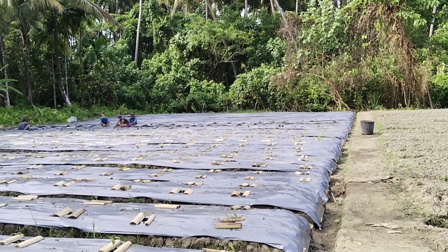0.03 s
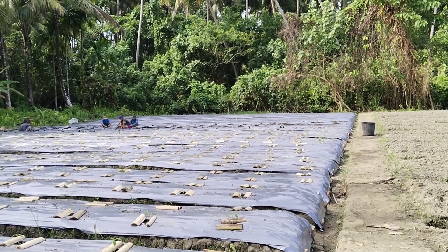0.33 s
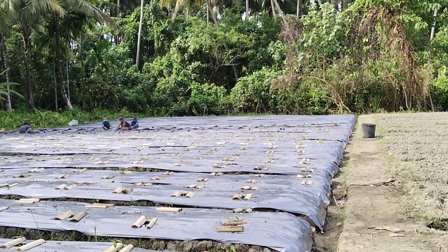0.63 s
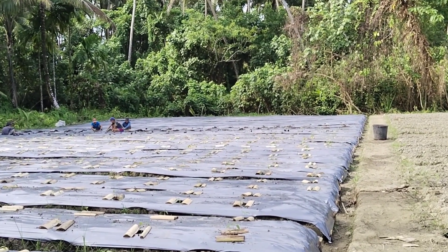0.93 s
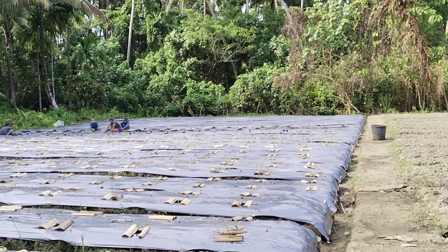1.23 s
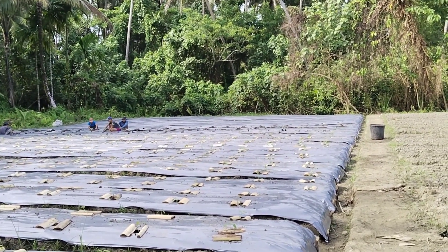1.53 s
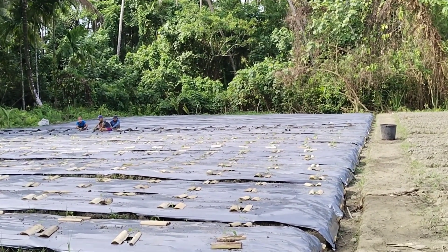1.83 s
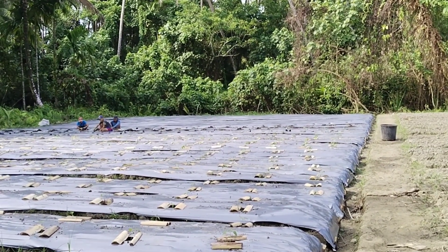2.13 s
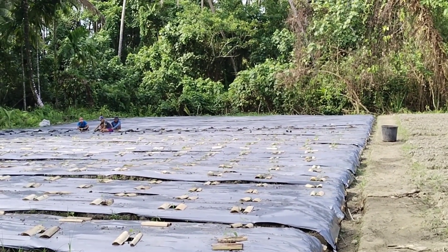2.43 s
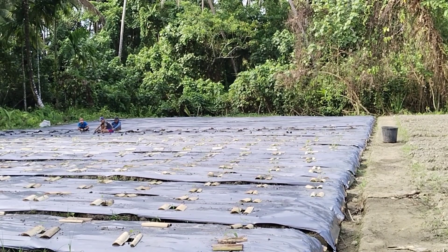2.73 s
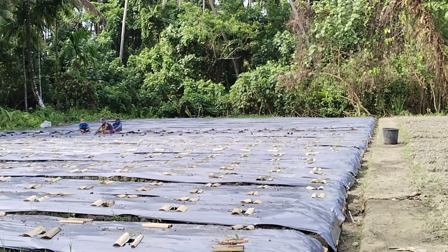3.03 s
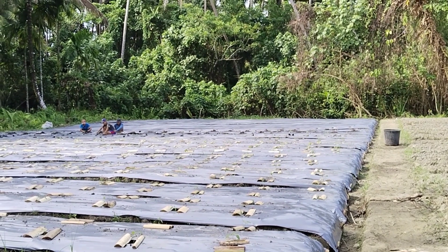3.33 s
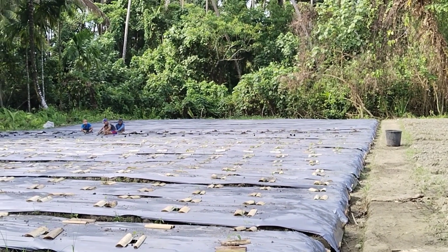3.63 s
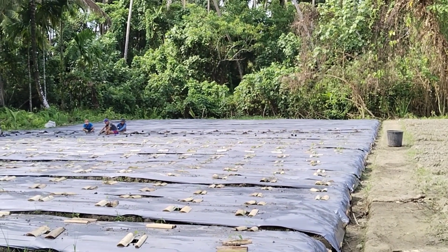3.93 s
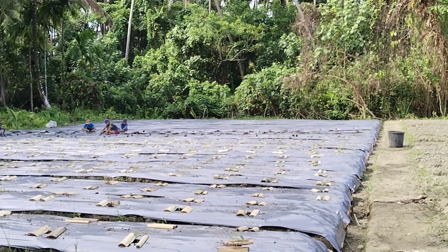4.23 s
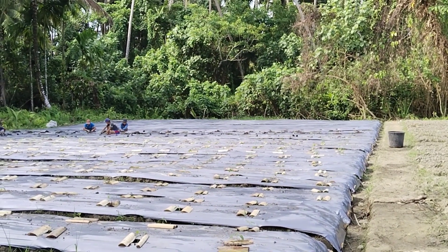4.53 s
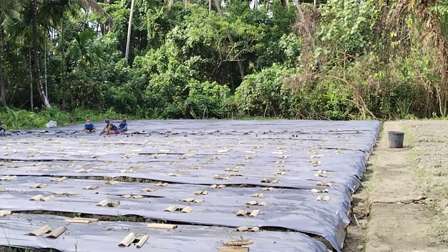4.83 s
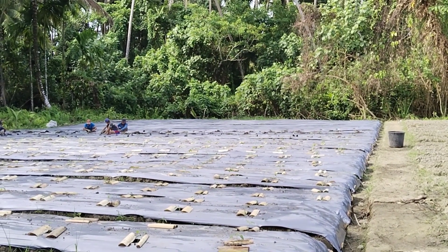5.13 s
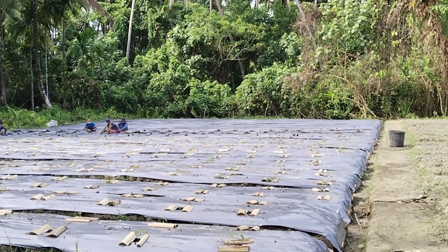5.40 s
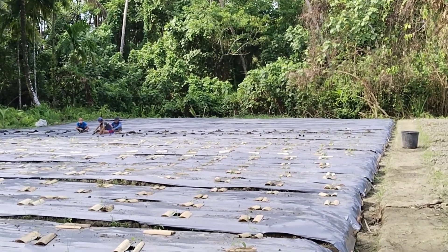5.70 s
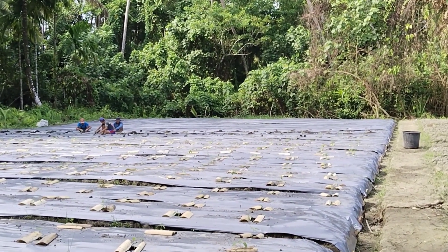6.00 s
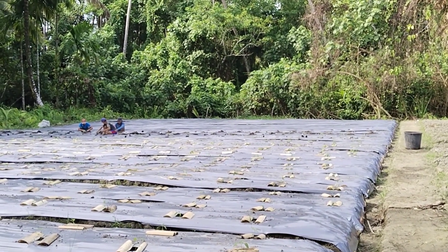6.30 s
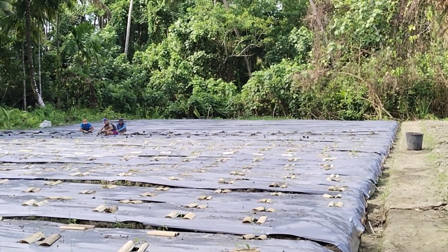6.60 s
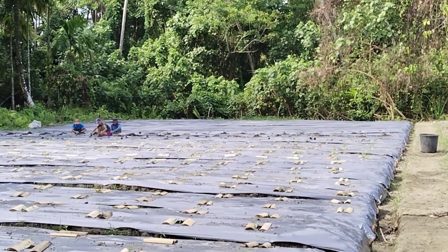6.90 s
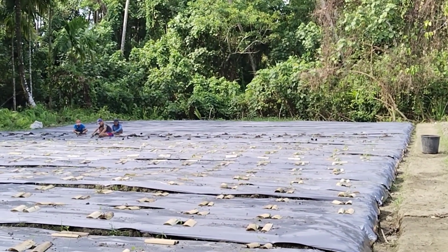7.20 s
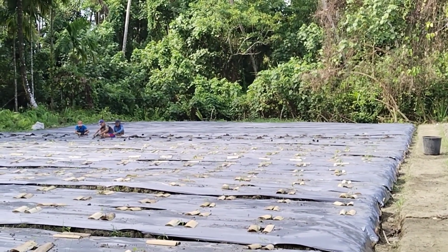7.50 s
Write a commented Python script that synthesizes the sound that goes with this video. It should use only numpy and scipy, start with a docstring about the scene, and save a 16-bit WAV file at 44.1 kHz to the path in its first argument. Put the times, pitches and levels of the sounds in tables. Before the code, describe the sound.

A bird sings loud whistles ending in sharp falling whips over steady crickets, hissing insects and a light breeze.

```python
"""Crickets trill and bush crickets hiss, wing on wing, over a light breeze and a distant rumble
at the edge of a tropical wood. A bird's whip dies away among the trees; dry leaves rustle.
The bird sings four phrases: a pip, a long rising whistle, two loud falling whips.
A thin insect note and far birds come and go. Late on, a small bird adds very high squeaks.
Trunks and leaves scatter every bird note."""
import sys
import numpy as np
from scipy import signal
from scipy.fft import rfft, irfft, next_fast_len
from scipy.io import wavfile
from scipy.ndimage import uniform_filter1d, map_coordinates

SR = 44100
rng = np.random.default_rng(int(sys.argv[2]) if len(sys.argv) > 2 else 0)


def bounce(signal):
    """Save signal as a 16-bit WAV file at the path given by the first command-line argument."""
    frames = np.transpose(np.atleast_2d(signal))
    limited = np.clip(frames, -1, 1)
    pcm = np.round(limited * 32767).astype(np.int16)
    wavfile.write(sys.argv[1], SR, pcm)


N = 341775

# Table levels are relative; the sources add their own gains.
# cricket chorus: (pitch [Hz], scatter [Hz], pulse rate [Hz], level [dB])
CHORUS = [(3981, 9.57, 46, -61), (3996, 15, 17, -63.5), (4053, 8, 19.5, -65.5), (4016, 34, 44, -68.5)]
CHORUS_LEVEL = [(0, -59.5), (1, -59), (2, -58.5), (3, -59.5), (3.7, -60), (4.5, -58.5), (5.6, -57),
                (6.4, -58), (7.2, -58), (7.75, -60)]  # (time [s], level [dB])
# (faded in by [s], pitch [Hz], scatter [Hz], pulse rate [Hz], level [dB])
LONE_CRICKETS = [(4.5, 3198, 22, 34, -76), (0.5, 4780, 50, 26, -82.5), (4.5, 4300, 23, 37, -88),
                 (-2, 5590, 78, 26, -85.5)]
HISS_SPECTRUM = [(3760, -51), (6400, -16.5), (6550, -15), (7190, -2), (7630, 4), (8020, -1.5), (8480, -12),
                 (9100, -8.5), (9670, -11.5), (10500, -24.5), (13600, -59.5), (22000, -120)]  # bush crickets: (frequency [Hz], level [dB])
HISS_LEVEL = [(0.35, -68), (3.14, -68.5), (3.29, -71), (4.49, -66.5), (4.79, -67.5), (6.05, -67)]  # (time [s], level [dB])

BREEZE_SPECTRUM = [(12, -40.5), (20, -15), (30, -5), (44, 2.5), (72, 4.5), (106, 0.5), (135, -7.5),
                   (166, -17), (260, -20.5), (400, -55.5)]  # (frequency [Hz], level [dB])
BREEZE_LEVEL = [(0.05, -61.5), (0.39, -62.5), (0.63, -54.5), (1.18, -58.5), (2.39, -49), (3.01, -56),
                (3.05, -47), (3.35, -56), (4.5, -50.5), (4.72, -55), (4.76, -52), (6.19, -55.5),
                (7.68, -54), (7.7, -60)]  # (time [s], level [dB])
RUMBLE_SPECTRUM = [(82, -39), (140, 0), (156, -5.5), (209, -6), (292, -2), (381, -0.5), (498, -8.5),
                   (751, -2), (840, -2), (1030, -9), (1200, -18), (1600, -15), (1750, -19.5), (2000, -20),
                   (2600, -44), (4400, -120)]  # (frequency [Hz], level [dB])
LEAF_SPECTRUM = [(1000, -18), (1600, -5), (2400, 6.5), (3000, -0.5), (4500, -3), (6500, -10),
                 (10000, -18.5)]  # (frequency [Hz], level [dB])
DISTANT_LEVEL = [(0.05, -60), (0.82, -57.5), (1.18, -59.5), (1.67, -55.5), (3.52, -59), (4.18, -57),
                 (7.49, -58.5), (7.7, -57)]  # rumble and leaf wash: (time [s], level [dB])
RUSTLES = [(0.085, 0.23, -63), (0.205, 0.05, -65), (2.963, 0.011, -62), (4.42, .012, -67)]  # (time [s], length [s], level [dB])
RUSTLE_SPECTRUM = [(1800, -18), (2400, 3), (2900, -12), (3450, 0.5), (3800, -2), (4450, -6), (5000, -7),
                   (5450, -6), (5900, -4), (6500, -5), (7500, -17), (11000, -28)]  # (frequency [Hz], level [dB])
WOOD_DECAY = [(2000, 0.8), (3300, 0.66), (8000, 0.7)]  # (frequency [Hz], T60 [s])

# (pip time [s], pip pitch [Hz], pip level [dB], whistle pitch [Hz], whistle level [dB],
#  first whip time [s], whip level [dB])
PHRASES = [(.5235, 3020, -38.5, 2245, -49.5, .8727, -31.2), (2.0435, 3000, -38.5, 2228, -49, 2.3840, -31.5),
           (2.7895, 2930, -39.8, 2205, -51.5, 3.1717, -32.5),
           (5.6245, 2900, -41, 2190, -54.5, 5.9907, -30.5)]
PIP_PATH = [(0, 0.96, -13), (.003, 0.99, -1.5), (.008, 0.926, -3.5), (.012, .85, -10.5), (.017, .78, -14)]  # (time [s], pitch [ratio], level [dB])
WHISTLE_PITCH = [(0, .87), (.07, .93), (.16, .97), (.37, .985), (.55, .993), (.72, 1), (1, .99)]  # (position [0-1], pitch [ratio])
WHISTLE_LEVEL = [(0, -15), (.15, -9.5), (.37, -1), (.46, -4.5), (.66, .5), (.79, 1), (.83, -12), (.92, -7),
                 (1, -14)]  # two swells, a drop, a soft end: (position [0-1], level [dB])
SHORT_WHIP_PATH = [(0, 3690, -13), (.002, 3440, -5.5), (.008, 3126, -0.5), (0.011, 2850, -5),
                   (0.015, 2580, -10), (.021, 2440, -13)]  # (time [s], pitch [Hz], level [dB])
LONG_WHIP_PATH = [(0, 3650, -13), (.003, 3700, -1), (.012, 3520, -1.5), (.022, 3284, -2.5),
                  (.032, 3014, -3.5), (.042, 2650, -11), (.052, 2333, -22), (.062, 1990, -30)]  # (time [s], pitch [Hz], level [dB])

INSECT_NOTES = [(.85, -65), (2.22, -64), (3.56, -66.5), (4.85, -67), (5.2, -70), (6.2, -68.5), (6.65, -69),
                (7.55, -70.5)]  # (time [s], level [dB])
INSECT_PATH = [(0, 5800, -4), (.09, 5920, 1), (.2, 5986, -7.5), (.45, 6070, -8), (.9, 6120, -15)]  # (time [s], pitch [Hz], level [dB])
FAR_SLIDES = [(1.109, 0.066, 6600, 7400, -68), (1.28, 0.051, 4300, 4550, -74),
              (1.48, 0.042, 5400, 5100, -69), (1.98, 0.044, 5600, 5130, -72),
              (3.794, 0.029, 1750, 2220, -64), (3.916, 0.019, 1857, 2060, -66),
              (7.041, .17, 2108, 2166, -66.5)]  # (time [s], length [s], start [Hz], end [Hz], level [dB])
FAR_CHIPS = [(3.83, 5900, -64), (4.924, 5750, -58.5), (6.113, 6000, -55), (6.86, 5640, -58)]  # (time [s], top [Hz], level [dB])
SLURS = [(6.127, 0.022, 8200, 7720, -52), (6.143, 0.044, 7010, 6420, -47),
         (6.225, 0.047, 8850, 8700, -51.5), (6.412, 0.094, 9050, 8650, -54), (6.85, 0.028, 7400, 6430, -50),
         (7.07, .055, 7460, 6050, -54), (7.295, 0.03, 6940, 6700, -47), (7.335, 0.037, 6900, 6100, -56)]  # small bird: (time [s], length [s], start [Hz], end [Hz], level [dB])
SQUEAKS = [(6.389, 0.08, 8670, 7080, -45.5), (6.597, 0.098, 9000, 7900, -43.5),
           (6.825, 0.085, 8830, 7950, -44.5), (7.066, .109, 8820, 8060, -44),
           (7.324, .112, 8900, 8520, -45)]  # small bird: (time [s], length [s], top [Hz], shelf [Hz], level [dB])


def amp(db):
    """Decibels to gain."""
    return 10 ** (np.asarray(db) / 20)


def unit_rms(x):
    """Scale to rms 1."""
    return x / np.sqrt(np.mean(x ** 2) + 1e-20)


def log_interp(points, hz):
    """Interpolate (frequency [Hz], value) points on a log axis."""
    knots_hz, values = np.transpose(points)
    return np.interp(np.log(hz + 1), np.log(knots_hz + 1), values)


def curve(points):
    """Interpolate (time [s], value) points at every sample."""
    return np.interp(np.arange(N) / SR, *np.transpose(points))


def wobble(rate_hz):
    """Smooth random curve with knots at rate_hz."""
    knots = rng.standard_normal(int(N * rate_hz / SR) + 4)
    return map_coordinates(knots, [np.arange(N) * rate_hz / SR])


def sine(hz):
    """Oscillator following a per-sample frequency."""
    return np.sin(2 * np.pi * np.cumsum(hz) / SR)


def filtered(x, response):
    """Apply the gain response(hz)."""
    size = next_fast_len(N + 8192)
    return irfft(rfft(x, size) * response(np.fft.rfftfreq(size, 1 / SR)), size)[:N]


def noise(spectrum):
    """Coloured noise, rms 1."""
    return unit_rms(filtered(rng.standard_normal(N), lambda hz: amp(log_interp(spectrum, hz))))


def add(out, start_s, x):
    """Mix x into out."""
    i = max(round(start_s * SR), 0)
    out[i:i + len(x)] += x[:len(out[i:])]


def note(path, rasp=0):
    """Tone along (time [s], pitch [Hz], level [dB]) points; rasp is fractional pitch jitter."""
    s, hz, db = np.transpose(path)
    t = np.arange(s[0], max(s[-1], s[0] + .004), 1 / SR)
    jitter = np.interp(t, np.linspace(t[0], t[0] + 1, 600), rng.standard_normal(600))
    pitch_hz = uniform_filter1d(np.interp(t, s, hz), size=130) * (1 + rasp * jitter)
    ramp = np.clip(np.minimum(t - t[0], t[-1] - t) / .002, 0, 1)
    envelope = amp(np.interp(t, s, db)) * np.sin(ramp * np.pi / 2) ** 2
    return np.sqrt(2) * envelope * sine(pitch_hz)


def among_trees(x, wet_db, build_s):
    """Direct sound plus scatter from trunks and leaves that builds up and dies away."""
    hz, t, bins = signal.stft(rng.standard_normal(int(SR * .8)), SR, nperseg=256)
    decay = amp(-60 * t / log_interp(WOOD_DECAY, hz)[:, None])
    onset = 1 - np.exp(-(t / build_s) ** 2)
    tail = signal.istft(bins * decay * onset, SR, nperseg=256)[1]
    impulse = amp(wet_db) * tail / np.linalg.norm(tail)
    impulse[0] += 1
    return signal.fftconvolve(x, impulse)


def near_leaves(x, wet_db, delay_s, decay_s):
    """Direct sound plus early echoes from foliage round the perch."""
    t = np.arange(SR // 8) / SR
    impulse = rng.standard_normal(len(t)) * np.exp(-t / decay_s) * (t > delay_s)
    impulse *= amp(wet_db) / np.linalg.norm(impulse)
    impulse[0] = 1
    return signal.fftconvolve(x, impulse)


def cricket(hz, scatter_hz, pulse_hz):
    """Wings ring at one wavering pitch, pulsing with the strokes; rms 1."""
    pitch_hz = hz + scatter_hz * (wobble(70) + .4 * wobble(3))
    strokes = 1 + .18 * sine(pulse_hz * (1 + .01 * wobble(3.12)))
    return unit_rms(strokes * sine(pitch_hz))


def crickets():
    """Close pitches beat into one trill; lone crickets deep in the trees blur behind it."""
    chorus = sum(amp(db + 1.3 * wobble(6.1)) * cricket(*voice) for *voice, db in CHORUS)
    out = amp(curve(CHORUS_LEVEL) + 1.5) * unit_rms(chorus)
    for full_s, *voice, db in LONE_CRICKETS:
        fade_in = np.clip((np.arange(N) / SR - full_s) * 2 + 1, 0, 1)
        blurred = unit_rms(among_trees(cricket(*voice), wet_db=9, build_s=.01)[:N])
        out += fade_in * amp(db + 1.5 * wobble(3.06)) * blurred
    return out


def bush_crickets():
    """Countless high stridulations merge into a slowly swelling and sinking hiss."""
    return amp(curve(HISS_LEVEL) + 5 + .25 * wobble(1.8)) * noise(HISS_SPECTRUM)


def air():
    """Breeze on the microphone, distant rumble, soft wash of leaves."""
    buffeting = unit_rms(amp(1.22 * wobble(9)) * noise(BREEZE_SPECTRUM))
    breeze = amp(curve(BREEZE_LEVEL) + .36) * buffeting
    distant_db = curve(DISTANT_LEVEL)
    rumble = amp(distant_db + .75) * noise(RUMBLE_SPECTRUM)
    leaves = amp(distant_db - 13.5) * noise(LEAF_SPECTRUM)
    return breeze + rumble + leaves


def opening_echo(lead_s=.16):
    """The wood still rings with a whip sung lead_s before the start."""
    whip = among_trees(amp(-33) * note(LONG_WHIP_PATH), wet_db=-11, build_s=.024)
    out = np.zeros(N)
    add(out, 0, whip[int(lead_s * SR):])
    return out


def rustles():
    """Dry leaves brush and tick."""
    envelope = np.zeros(N)
    for start_s, length_s, db in RUSTLES:
        add(envelope, start_s, amp(db) * np.hanning(int(length_s * SR)))
    return envelope * unit_rms(amp(3 * wobble(90)) * noise(RUSTLE_SPECTRUM))


def whistling_bird(whistle_lag_s=.052, whip_lag_s=.0404, echo_s=.05, echo_db=-24.5):
    """Pip, whistle, short whip, long whip; the wood's edge throws the sharp notes back."""
    held, sharp = np.zeros(N), np.zeros(N)
    for pip_s, pip_hz, pip_db, whistle_hz, whistle_db, whip_s, whip_db in PHRASES:
        whistle_s = pip_s + whistle_lag_s
        tone = amp(whistle_db) * whistle(whip_s - whistle_s, whistle_hz)
        add(held, whistle_s, among_trees(tone, wet_db=-12.5, build_s=.037))
        pip = amp(pip_db) * note(np.array(PIP_PATH) * [1, pip_hz, 1])
        pip = near_leaves(pip, wet_db=-11, delay_s=.0075, decay_s=.012)
        add(sharp, pip_s, among_trees(pip, wet_db=-10.5, build_s=.027))
        for start_s, path in [(whip_s, SHORT_WHIP_PATH), (whip_s + whip_lag_s, LONG_WHIP_PATH)]:
            whip = amp(whip_db) * note(path, rasp=.0026)
            whip = near_leaves(whip, wet_db=-7, delay_s=.009, decay_s=.036)
            add(sharp, start_s, among_trees(whip, wet_db=-11.5, build_s=.029))
    add(sharp, echo_s, amp(echo_db) * sharp)
    return held + sharp


def whistle(length_s, hz, waver_db=2):
    """A pure note scoops up to pitch and holds, swelling and wavering in level."""
    position = np.linspace(0, 1, 60)
    pitch_hz = hz * np.interp(position, *np.transpose(WHISTLE_PITCH))
    level_db = np.interp(position, *np.transpose(WHISTLE_LEVEL))
    tone = note(np.column_stack([position * length_s, pitch_hz, level_db]), rasp=.0093)
    return tone * amp(waver_db * wobble(35.2)[:len(tone)])


def rising_insect():
    """A thin buzzing note slides up and fades."""
    out = np.zeros(N)
    for start_s, db in INSECT_NOTES:
        tone = amp(db - 6) * note(INSECT_PATH, rasp=.016)
        buzz = 1 + .77 * wobble(130)[:len(tone)]
        add(out, start_s, among_trees(tone * buzz, wet_db=0, build_s=.014))
    return out


def far_birds():
    """Faint slides and chips, the high ones hoarse, blurred by the wood."""
    out = np.zeros(N)
    for table, make_path in [(FAR_SLIDES, slide_path), (FAR_CHIPS, chip_path)]:
        for start_s, *row in table:
            path = make_path(*row)
            start_hz = path[0][1]
            call = note(path, rasp=.035 if start_hz > 3000 else .006)
            call = near_leaves(call, wet_db=-1, delay_s=.00071, decay_s=.0092)
            add(out, start_s, among_trees(call, wet_db=-5, build_s=.0052))
    return amp(-1) * out


def slide_path(length_s, start_hz, end_hz, db):
    """Straight pitch slide, loudest in the middle."""
    return [(0, start_hz, db - 3),
            (length_s / 2, (start_hz + end_hz) / 2, db),
            (length_s, end_hz, db - 4.5)]


def chip_path(top_hz, db, length_s=.034):
    """Pitch flicks straight up and down."""
    foot_hz = .73 * top_hz
    return [(0, foot_hz, db - 10), (length_s / 2, top_hz, db), (length_s, foot_hz, db - 9.5)]


def small_bird(flutter_db=3):
    """Slightly hoarse squeaks and slurs; the two sides of the syrinx overlap."""
    out = np.zeros(N)
    for table, make_path in [(SQUEAKS, squeak_path), (SLURS, slide_path)]:
        for start_s, *row in table:
            call = note(make_path(*row), rasp=.0081)
            call *= amp(flutter_db * wobble(115)[:len(call)])
            call = near_leaves(call, wet_db=-5.5, delay_s=.0015, decay_s=.0066)
            add(out, start_s, among_trees(call, wet_db=-1.5, build_s=.015))
    return amp(-3) * out


def squeak_path(length_s, top_hz, shelf_hz, db, sag=.011):
    """Pitch arches up, settles on a sloping shelf, falls away."""
    return [(0, .92 * top_hz, db - 6),
            (.112 * length_s, top_hz, db),
            (.192 * length_s, top_hz, db),
            (.35 * length_s, (1 + sag) * shelf_hz, db),
            (.72 * length_s, (1 - sag) * shelf_hz, db),
            (length_s, .87 * shelf_hz, db - 9)]


def scene():
    """Birds, insects and air over the field; mono."""
    birds = whistling_bird() + opening_echo() + small_bird() + far_birds()
    return (birds + crickets() + rising_insect() + bush_crickets() + rustles() + air())[None]


def record(dry):
    """Steep low-pass band limit."""
    cutoff_hz = 10660
    return filtered(dry[0], lambda hz: 1 / np.sqrt(1 + (hz / cutoff_hz) ** 160))[None]


dry = scene()
out = record(dry)
bounce(out)
```